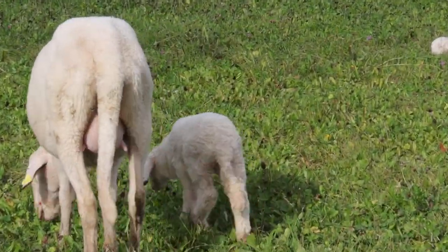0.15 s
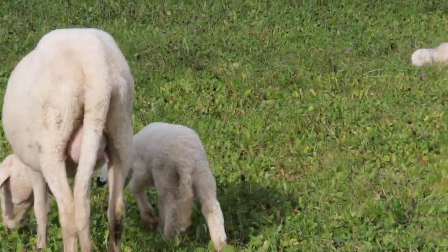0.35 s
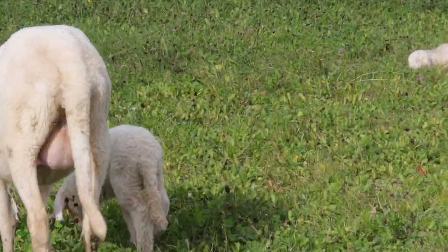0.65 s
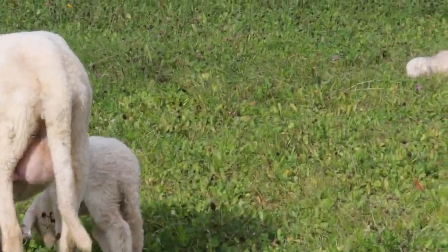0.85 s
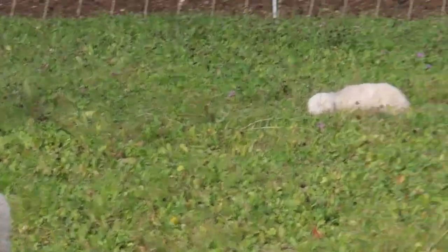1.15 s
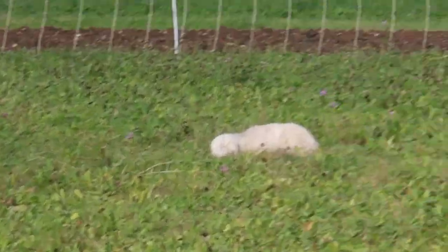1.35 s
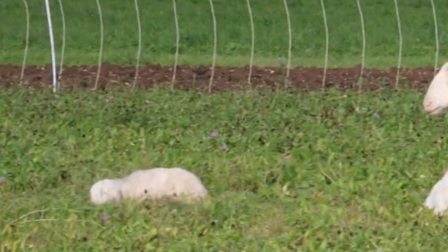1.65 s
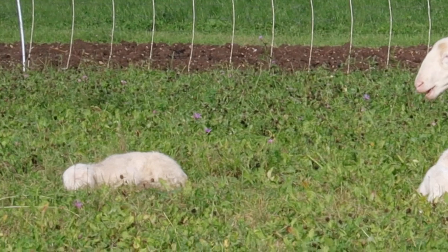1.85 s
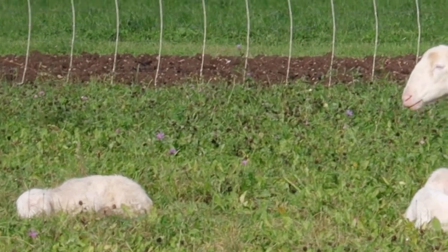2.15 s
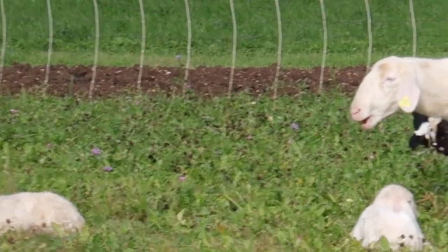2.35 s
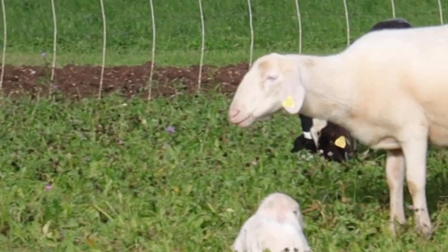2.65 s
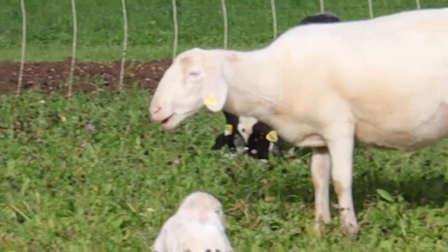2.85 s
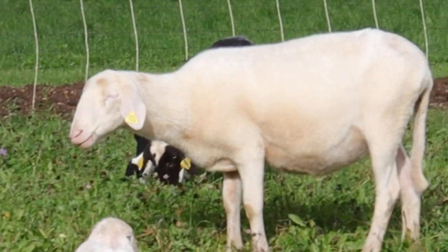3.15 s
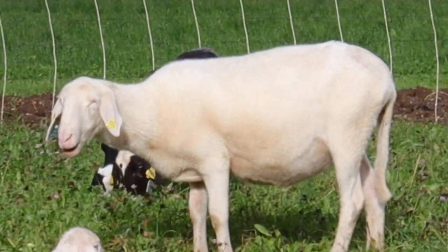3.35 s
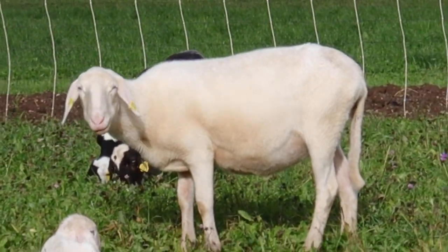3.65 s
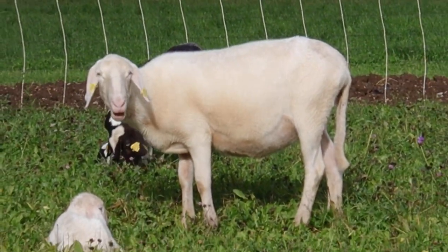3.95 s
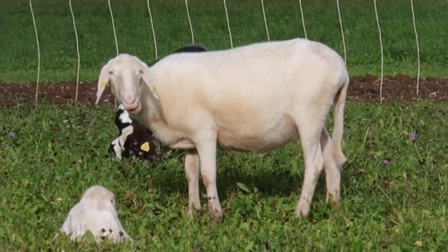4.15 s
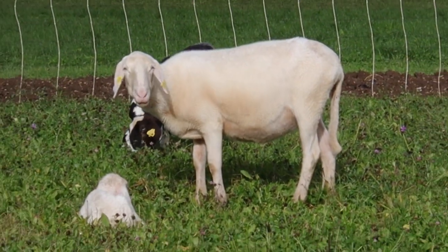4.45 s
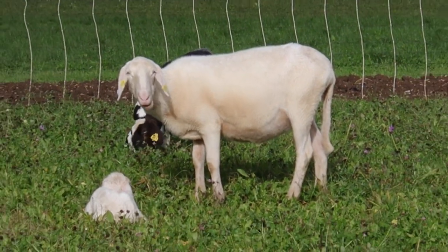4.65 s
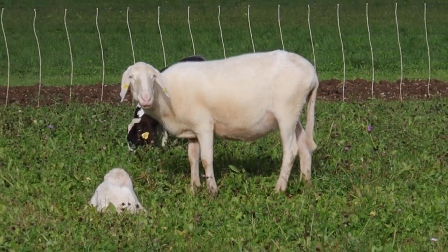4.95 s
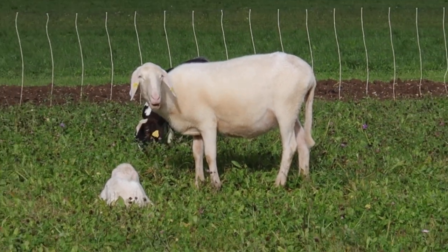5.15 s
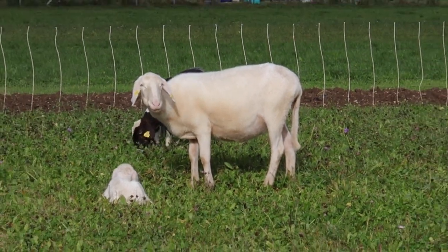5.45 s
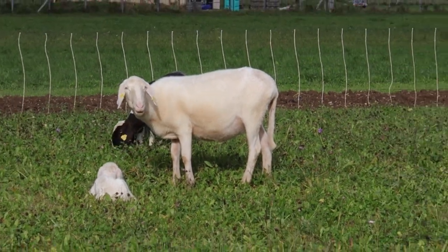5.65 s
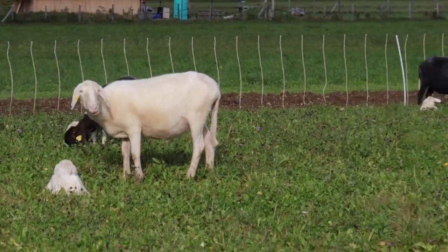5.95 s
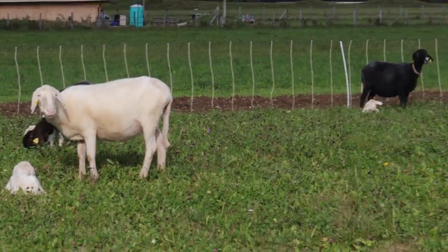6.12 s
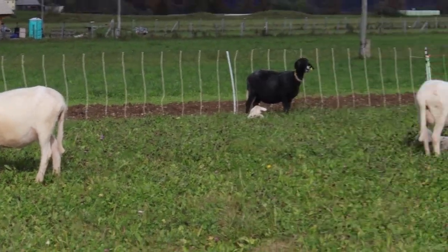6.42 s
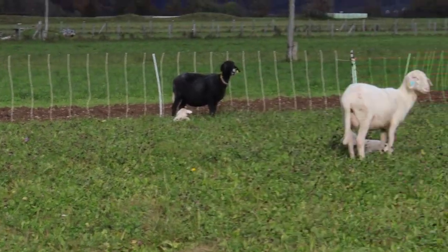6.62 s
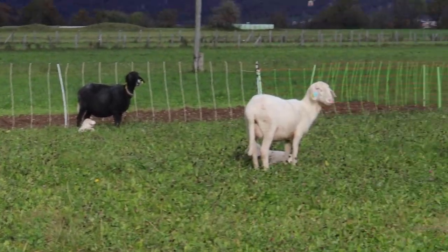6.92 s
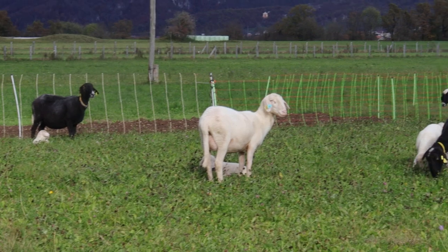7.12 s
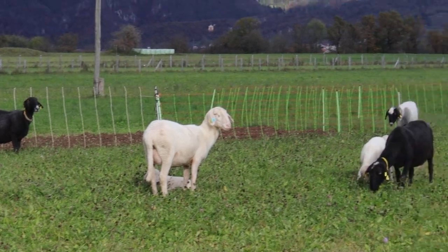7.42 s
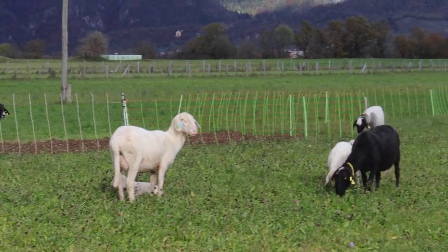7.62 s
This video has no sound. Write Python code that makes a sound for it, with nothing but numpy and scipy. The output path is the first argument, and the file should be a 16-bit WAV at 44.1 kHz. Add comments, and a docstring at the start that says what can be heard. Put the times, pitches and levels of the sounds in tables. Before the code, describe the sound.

Wind rumble and blunt thumps dominate, heavier on the right and muffled on the left. A short blast near the start gives way to scattered puffs, with delicate crackles of grass close by and a faint high motor whine. Then a long, rough gust nearly overloads the microphone. It fades into a quiet field with faint birds off to the left, brushing grass and a far road.

```python
"""Gusts of wind buffet the right port of a handheld camera on an open pasture where sheep graze.
The wind is a stream of short pressure swings, one per eddy, with harder single buffets that thump.
Close by, grass tears and snaps faintly as bursts of noise; farther off, gliding tones are small birds.
The zoom motor whines for about two seconds as narrow bands of noise.
Far away a valley murmurs and a road comes up, both of them coloured noise."""
import sys
import numpy as np
from scipy import signal
from scipy.fft import rfft, irfft, next_fast_len
from scipy.io import wavfile
from scipy.ndimage import uniform_filter1d

SR = 44100
rng = np.random.default_rng(int(sys.argv[2]) if len(sys.argv) > 2 else 0)


def transcribe(signal):
    """Save signal, clipped to [-1, 1], as a 16-bit WAV file at the path in sys.argv[1]."""
    frames = np.atleast_2d(signal).T
    limited = np.clip(frames, -1, 1)
    pcm = np.round(limited * 32767).astype(np.int16)
    wavfile.write(sys.argv[1], SR, pcm)


N = 343098
T = np.arange(N) / SR  # time of every sample, s
HZ = np.maximum(np.arange(N // 2 + 1) * SR / N, 1)  # frequency of every bin of a full-length spectrum


def undb(db):
    """Decibels to gain."""
    return 10 ** (np.asarray(db) / 20)


def unit(x):
    """Scale to rms 1."""
    return x / np.sqrt(np.mean(x ** 2) + 1e-20)


def curve(rows):
    """The columns of a table, after its time column, drawn out to every sample."""
    s, *columns = np.transpose(rows)
    return [np.interp(T, s, column) for column in columns]


def band(x, hz, octaves):
    """Keep a band around hz, bell-shaped over the octaves."""
    f = np.maximum(np.arange(x.shape[-1] // 2 + 1) * SR / x.shape[-1], 1)
    bell = np.exp(-.5 * (np.log2(f / hz) / octaves) ** 2)
    return irfft(rfft(x) * bell, x.shape[-1])


def walk(rate_hz):
    """A random drift with spread 1 and little movement above rate_hz."""
    noise = rfft(rng.standard_normal(N))
    return unit(irfft(noise * np.exp(-(HZ / rate_hz) ** 2), N))


def pan(db):
    """Gains of left and right, with the left louder by db."""
    return undb(np.array([[db], [-db]]) / 2)


def add(out, s, x):
    """Mix x into out, centred on time s."""
    start = int(s * SR) - x.shape[-1] // 2
    a, b = max(start, 0), min(start + x.shape[-1], N)
    if b > a:
        out[..., a:b] += x[..., a - start:b - start]


def valley(alike_hz=650, flicker_db=1.5):
    """Distant traffic and air: noise largely alike on both sides in the bass, diffuse in the treble."""
    # colour of the far valley: f/Hz, relative spectral level/dB
    spectrum = [(25, -30), (50, -19), (110, 3.5), (270, 4.5), (600, -5), (1050, -3), (1500, -5),
                (2100, -12), (3400, -16.5), (6000, -24), (10000, -27.5), (15500, -34.5)]
    # murmur before flicker and pan: t/s, level/dB
    swell = [(0, -54), (1.5, -56.5), (2.6, -56), (3.3, -54.5), (4.7, -55.5), (5.2, -57), (5.8, -52),
             (6.8, -56.5), (7.25, -56.5), (7.75, -54)]
    hz, db = np.transpose(spectrum)
    colour = undb(np.interp(np.log(HZ), np.log(hz), db))
    alike = .9 / (1 + (HZ / alike_hz) ** 4)
    mid = irfft(rfft(rng.standard_normal(N)) * colour * np.sqrt(1 + alike), N)
    side = irfft(rfft(rng.standard_normal(N)) * colour * np.sqrt(1 - alike), N)
    swell_db, = curve(swell)
    murmur = unit(np.array([mid + side, mid - side]))
    return murmur * undb(swell_db + flicker_db * walk(19)) * pan(db=1.5)


def road(hz=1020, octaves=0.29):
    """A far car comes into earshot as a soft band of tyre noise."""
    # tyres on a distant road: t/s, level/dB
    tyres = [(0, -76.5), (6.6, -76.5), (7.3, -59.5), (7.75, -57.5)]
    db, = curve(tyres)
    return unit(band(rng.standard_normal((2, N)), hz, octaves)) * undb(db)


def zoom_motor(hz=12330, octaves=.02, lower_hz=11880, lower_db=-7, skirt_db=-13):
    """The lens drive, running unevenly, excites two narrow resonances of the barrel over a broader hiss."""
    # the whine swells and fades, before its waver: t/s, level/dB
    zoom = [(3.2, -86), (3.3, -73), (3.9, -68), (4.3, -66.5), (4.8, -75), (5.4, -93), (5.6, -94)]
    db, = curve(zoom)
    buzz = rng.standard_normal((2, N))
    whine = band(buzz, hz, octaves)
    whine += undb(lower_db) * band(buzz, lower_hz, 0.013)
    whine += undb(skirt_db) * band(buzz, hz, .07)
    waver_db = 2.8 * walk(12)
    running = (T > zoom[0][0]) & (T < zoom[-1][0])
    return unit(whine) * undb(db + waver_db) * running


def call(rows, rough, ratio=1, flutter_db=0):
    """A sine on a gliding, trembling pitch; its level can flutter on the way across the field."""
    hz, db = curve(rows)
    sounding = (T > rows[0][0]) & (T < rows[-1][0])
    gate = uniform_filter1d(1. * sounding, size=200)  # soft edges
    level = gate * undb(db + flutter_db * walk(35))
    pitch = ratio * hz * (1 + rough * walk(230))
    return np.sqrt(2) * level * np.sin(2 * np.pi * np.cumsum(pitch) / SR)


def birds(echo_db=-11, echo_t60=0.54, size=22050):
    """Small birds far off to the left; the field scatters their calls into a faint decaying tail."""
    # levels here are those before flutter and pan
    # an arched chip: t/s, f/Hz, level/dB
    chip = [(3.895, 6700, -73), (3.903, 7350, -64), (3.925, 7150, -61.5), (3.957, 7160, -64),
            (3.967, 6700, -66), (3.98, 6557, -82)]
    # a thin, wavering whistle that dips briefly and ends higher: t/s, f/Hz, level/dB
    whistle = [(6.75, 7100, -79), (6.88, 7400, -79), (6.99, 7100, -78), (7.03, 7300, -78),
               (7.07, 7050, -79), (7.15, 7600, -78), (7.2, 7550, -86), (7.28, 7700, -77), (7.37, 7800, -83)]
    # a faint, almost level-pitched peep: t/s, f/Hz, level/dB
    peep = [(5.74, 4070, -78), (5.78, 3950, -69), (5.83, 3880, -80), (5.875, 3840, -70), (5.9, 3920, -80)]
    # a rough, dipping chirrup: t/s, f/Hz, level/dB
    chirrup = [(7.375, 3850, -69), (7.425, 3280, -65), (7.46, 3670, -68), (7.52, 3180, -69)]
    song = call(chip, rough=0.005)
    song += undb(-11) * call(chip, rough=0.0048, ratio=1.17)  # a second, higher voice
    song += call(whistle, rough=0.024, flutter_db=3.0)
    song += call(peep, rough=0.0084, flutter_db=3.5)
    song += call(chirrup, rough=0.06)
    decay = np.exp(-np.log(1000) * np.arange(size) / SR / echo_t60)
    tail = unit(rng.standard_normal((2, size)) * decay) / np.sqrt(size)
    echo = signal.fftconvolve(song[None], tail)[:, :N]
    return (song + undb(echo_db) * echo) * pan(db=9.5)


def grass(grain_db=6.5, tuft_octaves=0.57, snap_octaves=0.85, snap_s=0.0012, size=1024):
    """A tuft is a swell of tiny fibre cracks, noise of jumping level; a stalk gives one short tick."""
    # tufts torn or brushed: t/s at the middle, length/s, level/dB before the swell, centre f/Hz
    tufts = [(0.163, 0.08, -63.5, 6960), (1.107, 0.3, -72.5, 6000), (1.757, 0.093, -62, 10000),
             (2.21, 0.12, -70, 11000), (2.326, 0.084, -64.5, 10000), (2.488, 0.038, -63, 7540),
             (2.795, 0.11, -67, 7660), (2.95, 0.018, -67, 5050), (3.555, 0.053, -65, 9000),
             (5.865, 0.19, -69, 6540), (6.364, 0.041, -69, 6000), (6.772, 0.12, -61, 14000),
             (6.882, 0.83, -62, 2810), (6.918, 0.6, -67, 15000), (7.101, 0.15, -60, 3170),
             (7.7, 0.36, -63, 3380)]
    # stalks that snap: t/s, peak level/dB, centre f/Hz
    snaps = [(0.167, -41, 8900), (1.056, -44, 3500), (1.697, -42, 12000), (1.752, -39.5, 8000),
             (1.846, -37, 11500), (2.441, -40, 10000), (2.804, -41.5, 2470), (2.817, -35.5, 12000),
             (2.892, -34, 2180), (2.892, -38, 10800), (2.942, -45.5, 3500), (2.964, -39, 6050),
             (3.545, -38, 10100), (6.366, -43, 5440), (6.717, -32.5, 2880)]
    out = np.zeros((2, N))
    for s, length, db, hz in tufts:
        n = next_fast_len(int(2 * length * SR) + size)  # the swell's skirts double the length
        fibres = np.repeat(undb(grain_db * rng.standard_normal(n) / 2), repeats=32)[:n]
        tearing = unit(band(fibres * rng.standard_normal((2, n)), hz, tuft_octaves))
        add(out, s, tearing * np.hanning(n) ** 2 * undb(db))
    t = (np.arange(size) - size // 2) / SR
    decay = (t >= 0) * np.exp(-abs(t) / snap_s)
    for s, db, hz in snaps:
        tick = band(rng.standard_normal((2, size)) * decay, hz, snap_octaves)
        add(out, s, tick / abs(tick).max() * undb(db))
    return out


def airflow(breeze_eddy_hz=407, attack_s=0.0056, release_s=0.02, sag_db=1):
    """Wind strength (dB) and eddy frequency (Hz): a breeze plus puffs that rise, sag and die, with lulls."""
    # the breeze under the puffs, building to one long gust: t/s, level/dB
    breeze = [(0, -55.5), (.3, -32.5), (1.3, -43), (1.5, -55.5), (1.6, -48), (2.3, -47), (2.65, -61),
              (2.92, -33.5), (3.36, -45), (3.65, -44.5), (4.3, -40), (4.53, -41), (5.1, -21), (5.59, -26),
              (5.87, -29.5), (6.4, -29.5), (6.8, -33.5), (6.85, -72)]
    # puffs: start t/s, length/s, level/dB before the sag, mean eddy f/Hz at the reference strength
    puffs = [(.005, 0.026, -36, 397), (0.143, 0.055, -32, 395), (.318, 0.048, -27.5, 424),
             (0.36, 0.063, -19.5, 573), (0.428, 0.076, -23.5, 555), (0.562, 0.054, -23, 414),
             (0.642, 0.095, -31.5, 452), (0.796, 0.0095, -20.5, 440), (0.886, 0.055, -29, 510),
             (0.951, 0.057, -28.5, 560), (1.086, 0.099, -32, 416), (1.221, 0.021, -32, 364),
             (1.33, 0.11, -38.5, 570), (1.557, 0.037, -39, 470), (1.824, 0.074, -40.5, 350),
             (2.092, 0.037, -44, 380), (2.264, 0.033, -35.5, 265), (2.352, 0.016, -37, 320),
             (2.398, 0.096, -30, 452), (2.691, 0.063, -35, 450), (2.852, 0.042, -29, 340),
             (2.931, 0.072, -30.5, 366), (3.041, 0.18, -35.5, 470), (3.512, 0.01, -31.5, 480),
             (3.712, 0.084, -29, 424), (3.797, 0.15, -32, 498), (3.977, 0.06, -28, 495),
             (4.113, 0.11, -33.5, 443), (4.209, 0.16, -27, 382), (4.265, 0.022, -20, 313),
             (4.382, 0.023, -24.5, 424), (4.442, 0.064, -28.5, 463), (4.542, 0.055, -34.5, 460),
             (4.623, 0.081, -30.5, 457), (4.764, 0.099, -26, 480), (4.86, 0.089, -18, 420),
             (4.974, 0.098, -18.5, 360), (5.141, 0.19, -21, 554), (5.328, 0.21, -22.5, 516),
             (5.654, 0.085, -17.5, 360), (5.772, 0.15, -21, 412), (5.963, 0.095, -24.5, 496),
             (6.076, 0.15, -24.5, 480), (6.216, 0.094, -25.5, 456), (6.44, 0.081, -23, 390),
             (6.574, 0.13, -28.5, 440), (6.722, 0.074, -32.5, 494), (6.886, 0.085, -33.5, 410),
             (7.038, 0.01, -30.5, 600), (7.466, 0.026, -42, 533)]
    # lulls, where the flow briefly leaves the port: t/s at the middle, length/s, drop/dB
    lulls = [(0.072, 0.049, 17), (0.257, 0.028, 12), (0.557, 0.031, 3), (0.64, 0.018, 11),
             (0.846, 0.061, 18), (2.906, 0.024, 12), (3.779, 0.016, 22), (4.526, 0.018, 15),
             (4.845, 0.018, 6), (4.96, 0.024, 7.5), (5.187, .018, 2.5), (5.231, 0.015, 10.5),
             (5.305, 0.012, 6), (5.433, 0.043, 3), (5.54, 0.019, 4.5), (5.616, .02, 4), (5.679, 0.027, 6.5),
             (5.758, .012, 10), (5.969, .016, 13), (6.204, 0.024, 3.5), (6.398, 0.022, 10),
             (6.552, 0.019, 0.5)]
    power = undb(curve(breeze)[0]) ** 2
    weighted_hz = power * breeze_eddy_hz
    for s, length, db, hz in puffs:
        a, b = np.searchsorted(T, [s, s + length + 10 * release_s])
        age = T[a:b] - s
        rise = np.minimum(age / attack_s, 1)
        fall = np.exp(-np.maximum(age - length, 0) / release_s)
        puff = (rise * fall * undb(db - sag_db * age / length)) ** 2
        power[a:b] += puff
        weighted_hz[a:b] += puff * hz
    drop_db = np.zeros(N)
    for s, length, db in lulls:
        add(drop_db, s, db * signal.windows.tukey(int(length * SR) + 3))
    return 10 * np.log10(power) - drop_db, weighted_hz / power


def eddies(times, sizes, hz, turns, shape=2.76, size=600):
    """Each eddy is one smooth swing of pressure; faster ones are shorter and so brighter."""
    lag = np.arange(size) - size // 2
    swept = 2 * np.pi * hz[:, None] / (shape + .5) * lag / SR  # makes hz the mean frequency
    envelope = (1 + swept ** 2) ** (-(shape + 1) / 2)
    phase = (shape + 1) * np.arctan(swept) + 2 * np.pi * turns[:, None]
    swings = sizes[:, None] * envelope * np.cos(phase) * np.hanning(size)
    at = np.clip((times * SR).astype(int)[:, None] + lag, 0, N)
    return np.bincount(at.ravel(), swings.ravel(), N + 1)[:N]


def wind(flutter_db=-1, buffet_db=-4.0, reference_db=-28, gust_octaves=0.047, size_octaves=0.035,
         spread_octaves=.3, scatter_db=0.5, wake_db=-8, wake_s=0.00286, lull=0.25,
         light_patch_db=9.5, strong_patch_db=5.5, count=3300):
    """A stream of eddies over the port: the stronger the gust, the louder and brighter they are."""
    # single eddies that thump out of the stream: t/s, level/dB before buffet_db, mean f/Hz
    buffets = [(0.148, -20, 400), (0.171, -18.5, 540), (0.327, -10.5, 456), (.337, -10.5, 610),
               (.351, -6, 735), (.371, -5, 700), (.381, -8, 650), (0.392, -5, 1260), (0.408, -11, 1050),
               (.42, -4, 710), (.429, -11, 900), (0.439, -4.5, 640), (.452, -17, 740), (0.46, -14, 1200),
               (.485, -12.5, 1200), (.58, -16, 830), (0.601, -14, 605), (.681, -11, 586), (.809, -11, 547),
               (0.906, -13, 423), (.956, -18, 760), (0.974, -3.5, 527), (1.387, -17.5, 553),
               (1.825, -21, 306), (1.873, -22.5, 288), (2.306, -18, 337), (2.427, -11, 590),
               (2.46, -10.5, 404), (2.487, -14, 487), (2.872, -11.5, 360), (2.924, -11.5, 430),
               (2.944, -11.5, 700), (3.002, -13, 487), (3.134, -6, 586), (3.174, -15, 517),
               (3.534, -10.5, 445), (3.72, -17, 460), (3.817, -13, 410), (4.218, -8, 487),
               (4.293, -1.5, 595), (4.333, -4.5, 850), (4.476, -10.5, 620), (4.666, -10, 580),
               (4.827, -1, 640), (4.834, 0.5, 917), (4.869, -11, 764), (4.892, -8, 636), (4.905, -4, 940),
               (4.92, -.5, 710), (4.931, -3, 970), (4.969, -6, 610), (4.992, -8, 570), (5.03, -7.5, 1100),
               (5.037, -1.5, 605), (5.04, 0.5, 1500), (5.041, 7, 890), (5.067, -1, 494), (5.071, 2, 910),
               (5.103, -7, 865), (5.16, -.5, 1010), (5.17, -10, 1000), (5.199, -0.5, 930),
               (5.217, -5.5, 720), (5.238, -14, 1100), (5.254, -2, 1090), (5.27, -11, 860),
               (5.288, -9.5, 1050), (5.313, -1.5, 786), (5.378, -6, 716), (5.385, -7, 1120),
               (5.395, -7.5, 720), (5.463, -2, 750), (5.487, -7, 970), (5.526, -10, 640), (5.613, -10, 540),
               (5.645, -4, 546), (5.702, 1.5, 694), (5.707, -1, 845), (5.735, 0, 620), (5.755, -2, 700),
               (5.77, -14, 1100), (5.806, -10.5, 900), (5.812, -3.5, 614), (5.842, -15, 910),
               (5.878, -1, 780), (5.886, -12, 1120), (5.898, -3.5, 700), (5.959, -7.5, 604),
               (5.969, -4.5, 655), (5.995, -13, 735), (6.007, -7, 600), (6.083, -3.5, 784),
               (6.103, -9.5, 1140), (6.122, -6.5, 626), (6.146, -9, 874), (6.174, -8.5, 680),
               (6.188, -5.5, 634), (6.219, -18, 850), (6.24, -5.5, 610), (6.26, -5, 600), (6.27, -3.5, 567),
               (6.282, -15.5, 990), (6.297, -1, 660), (6.324, -8, 930), (6.352, -10.5, 585),
               (6.418, -6, 370), (6.458, -8, 746), (6.469, -2, 724), (6.486, -14.5, 920),
               (6.514, -14.5, 950), (6.524, -11, 840), (6.534, -5.5, 570), (6.672, -18, 690),
               (6.741, -5.5, 630), (6.759, -10, 503), (6.785, -10, 570), (6.81, -12, 436),
               (7.463, -21.5, 510)]
    gust_db, eddy_hz = airflow()
    times = (np.arange(count) + 2.5 * rng.random(count)) / count * N / SR
    chance = np.clip(rng.standard_normal((count, 2)), -1.8, 1.8)
    # light air comes in separate patches, a strong gust flows more evenly
    patch_depth_db = np.interp(gust_db, [-45, -28], [light_patch_db, strong_patch_db])
    patch_db = patch_depth_db * np.minimum(walk(50), 1.1)
    size_db = np.interp(times, T, patch_db) + scatter_db * chance[:, 0]
    # pitch rises by so many octaves for each dB of the gust and of the eddy's own size
    octaves = gust_octaves * (np.interp(times, T, gust_db) - reference_db)
    octaves += size_octaves * size_db + spread_octaves * chance[:, 1]
    stream_hz = np.interp(times, T, eddy_hz) * 2 ** octaves
    stream = eddies(times, undb(size_db), stream_hz, rng.random(count), shape=3.94)
    stream /= np.sqrt(uniform_filter1d(stream ** 2, size=2200) + 1e-6)  # even out over 50 ms
    # each hard eddy sheds a smaller, slower one right behind it
    s, level_db, buffet_hz = np.transpose(buffets)
    turns, wake_turns, delay = rng.random((len(s), 3)).T
    hard = eddies(s, undb(level_db + buffet_db), buffet_hz, turns, shape=3.46)
    wake_sizes = undb(level_db + buffet_db + wake_db)
    hard += eddies(s + wake_s * (.5 + delay), wake_sizes, buffet_hz * 0.62, wake_turns)
    # the flow weakens around a big eddy, starting just ahead of it
    ahead = np.roll(uniform_filter1d(hard ** 2, size=600), -200)
    flow = undb(gust_db + flutter_db)
    return stream * flow / np.sqrt(1 + lull * abs(ahead) / flow ** 2) + hard


def ports(pressure, low_cut_hz=85, mesh_hz=2550, ring_hz=300, ring_width_hz=180, ring_db=-13,
          share_hz=135, share_db=4.0, own_db=-21):
    """Wind strikes the right port; the left shares its bass and has a little flutter of its own."""
    s = 1j * HZ / low_cut_hz
    low_cut = s ** 3 / ((s + 1) * (s * s + s + 1))
    mesh = 1 / np.sqrt(1 + (HZ / mesh_hz) ** 8)
    # a short, hollow ring
    housing = 1 + undb(ring_db) / (1 + 1j * (HZ - ring_hz ** 2 / HZ) / ring_width_hz)
    right, own = rfft([pressure, pressure * walk(150)]) * low_cut * mesh * housing
    left = (right + undb(own_db) * own) * undb(share_db) / (1 + 1j * HZ / share_hz)
    return irfft(np.array([left, right]), N)


def scene():
    """Wind on the microphone over the quiet pasture."""
    far = valley() + road()
    near = zoom_motor() + birds() + grass()
    return far + near + ports(wind())


def record(dry, low_cut_hz=30, top_hz=15900):
    """Peaks beyond full scale clip at the input; then the deepest bass and the top are cut."""
    clipped = np.clip(dry, -1, 1)
    low_cut = signal.butter(1, low_cut_hz, "high", fs=SR, output="sos")
    top_cut = signal.ellip(8, .2, 70, top_hz, fs=SR, output="sos")
    return signal.sosfilt(top_cut, signal.sosfilt(low_cut, clipped))


dry = scene()
out = record(dry)
transcribe(out)
```